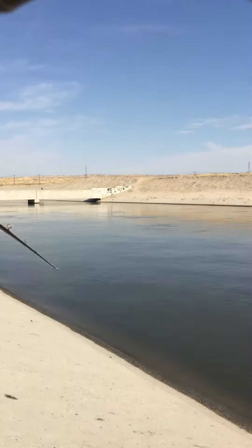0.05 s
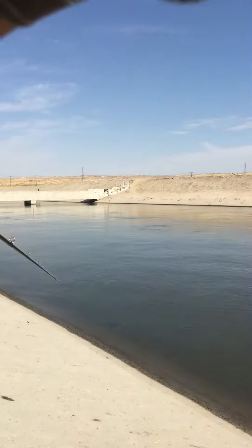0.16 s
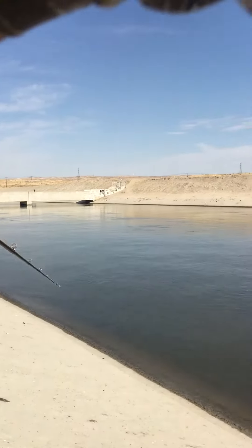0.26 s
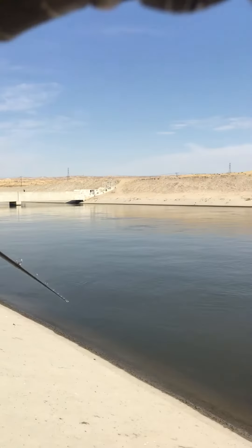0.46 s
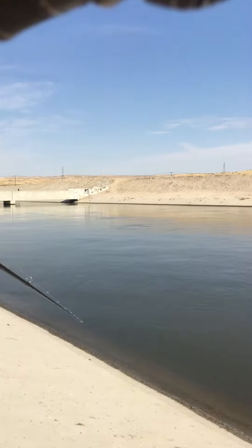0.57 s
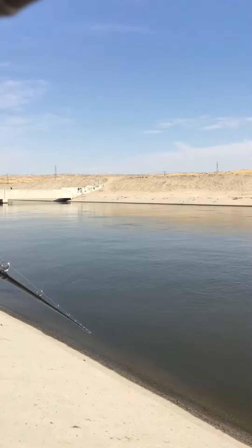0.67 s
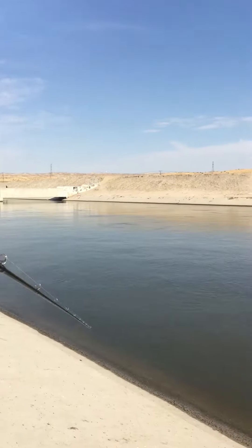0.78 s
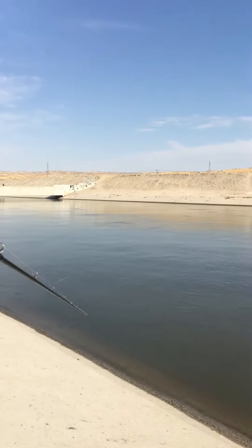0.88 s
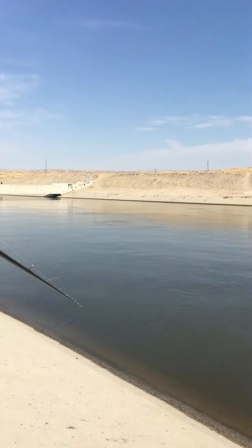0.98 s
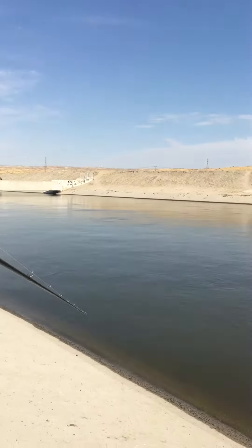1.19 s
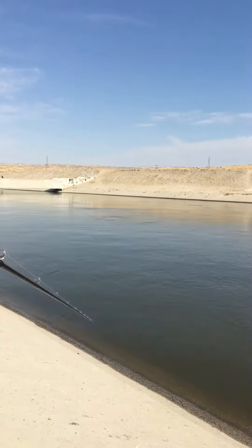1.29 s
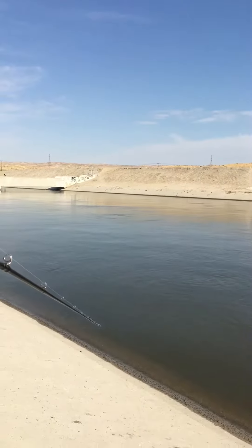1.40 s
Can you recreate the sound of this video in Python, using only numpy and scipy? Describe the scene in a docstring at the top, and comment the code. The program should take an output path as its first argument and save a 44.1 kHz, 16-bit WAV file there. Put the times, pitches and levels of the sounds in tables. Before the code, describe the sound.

One sharp plastic click from fishing gear, with faint scrapes, rustling and light wind.

```python
"""A small plastic part of some fishing gear snaps home close by: one sharp click, cracking and ringing.
Five short stick-slip scrapes lead up to it; a dull tap, soft rustling of hand and sleeve and tiny
ticks follow. Behind it lie a steady distant rush on the bank of a wide canal and a faint hiss.
Light wind buffets the microphone, most near the end."""
import sys
import numpy as np
from scipy import signal
from scipy.fft import rfft, irfft
from scipy.io import wavfile
from scipy.ndimage import uniform_filter1d

SR = 44100
rng = np.random.default_rng(int(sys.argv[2]) if len(sys.argv) > 2 else 0)


def bounce(signal):
    """Save signal as a 16-bit WAV file at the path given by the first command-line argument."""
    frames = np.transpose(np.atleast_2d(signal))
    limited = np.clip(frames, -1, 1)
    pcm = np.round(limited * 32767).astype(np.int16)
    wavfile.write(sys.argv[1], SR, pcm)


N = 63945
T = np.arange(N) / SR


def from_db(db):
    """Decibels to gain."""
    return 10 ** (np.asarray(db) / 20)


def unit_rms(x):
    """Scale to unit power."""
    return x / np.sqrt(np.mean(x ** 2) + 1e-20)


def envelope(rows):
    """Gain over time from rows of (s, dB)."""
    return from_db(np.interp(T, *np.transpose(rows)))


def colour(x, spectrum):
    """Minimum-phase filter of unit power gain, shaped by rows of (Hz, dB)."""
    hz, db = np.transpose(spectrum)
    grid_hz = np.linspace(0, SR / 2, N + 1)
    gain = unit_rms(from_db(np.interp(np.log(grid_hz + 1), np.log(hz), db)))
    cepstrum = irfft(np.log(gain))
    causal_fold = np.r_[1, np.full(N - 1, 2), 1, np.zeros(N - 1)]
    response = np.exp(rfft(cepstrum * causal_fold))
    return irfft(rfft(x, 2 * N) * response)[:N]


def noise(spectrum):
    """Coloured noise of unit power."""
    return unit_rms(colour(rng.standard_normal(N), spectrum))


def grains(per_s, spread_db):
    """Random tiny clicks of uneven size, unit power."""
    onsets = rng.random(N) < per_s / SR
    signs = rng.choice([-1, 1], N)
    sizes = from_db(spread_db * np.minimum(rng.exponential(1, N), 4))
    return unit_rms(onsets * signs * sizes)


def ring(force, modes):
    """Damped modes (Hz, dB, T60 s) driven by a force; signs alternate."""
    out = np.zeros(N)
    for k, (hz, db, t60_s) in enumerate(modes):
        radius = np.exp(-np.log(1000) / (t60_s * SR))
        angle = 2 * np.pi * hz / SR
        feedback = [1, -2 * radius * np.cos(angle), radius * radius]
        out += (-1) ** k * from_db(db) * signal.lfilter([0, np.sin(angle)], feedback, force + 1e-18)
    return out


def clicks(rows):
    """One impulse for each (s, dB)."""
    out = np.zeros(N)
    for start_s, db in rows:
        out[min(int(round(start_s * SR)), N - 1)] += from_db(db)
    return out


def bursts(rows, t60_s):
    """A decaying puff of white noise for each (s, dB)."""
    radius = np.exp(-np.log(1000) / (t60_s * SR))
    decay = signal.lfilter([1], [1, -radius], clicks(rows) + 1e-18)
    return decay * rng.choice([-1, 1], N)


def background(rush_db=-49.5):
    """Steady far rush and a faint hiss that swells and sinks."""
    # Each row: frequency in Hz, relative density in dB.
    rush_spectrum = [(30, -2), (120, -2), (250, -1), (430, -5), (700, -3), (1100, 1), (1400, -12),
                     (2000, -11.5), (3000, -21.5), (4500, -31), (8000, -39.5), (16000, -46.5)]
    hiss_spectrum = [(1500, -3.5), (3500, 0.5), (8000, -4.5), (9700, -4), (10600, -9), (16000, -10.5)]
    # Each row: time in seconds, level in dB.
    hiss_levels = [(0, -73.5), (.22, -71), (.27, -63), (.45, -62.5), (.62, -62.5), (.70, -79), (.84, -69.5),
                   (.90, -80.5), (1.10, -67), (1.16, -67.5), (1.25, -72.5), (1.45, -73)]
    return from_db(rush_db) * noise(rush_spectrum) + envelope(hiss_levels) * noise(hiss_spectrum)


def wind(swing_gain_db=2.5, eddy_db=-45.5, strong_gust_db=-39.5, eddy_exponent=1.9):
    """Slow pressure swings on the microphone follow the gusts; finer eddies grow faster than they do."""
    # Each row: time in seconds, relative level in dB.
    gust_levels = [(0.0, -67), (0.258, -47.5), (0.306, -57), (0.35, -47.5), (0.448, -58.5), (0.528, -46),
                   (0.642, -58.5), (0.702, -41.5), (0.758, -58.5), (0.794, -47), (0.944, -65), (1.062, -40),
                   (1.106, -49), (1.154, -34.5), (1.198, -47), (1.218, -36), (1.42, -48), (1.45, -45)]
    # Each row: frequency in Hz, relative density in dB.
    swing_spectrum = [(18, -30.5), (32, -16.5), (50, 4.5), (68, -3.5), (95, -12), (150, -22), (300, -36),
                      (800, -76)]
    eddy_spectrum = [(40, -24), (80, -1.5), (150, -3.5), (220, -24), (500, -31.5), (1200, -58)]
    gust = envelope(gust_levels)
    swings = noise(swing_spectrum)
    swings /= np.sqrt(uniform_filter1d(swings ** 2, size=2200) + 1e-6)  # even power over 50 ms
    eddies = noise(eddy_spectrum) * (gust / from_db(strong_gust_db)) ** eddy_exponent
    return from_db(swing_gain_db) * gust * swings + from_db(eddy_db) * eddies


def sleeve_brushes():
    """Cloth grains swell and fade with each short stroke."""
    # Each row: centre in seconds, peak in dB, Gaussian sigma in seconds.
    strokes = [(1.126, -58, 0.0063), (1.15, -53.5, 0.0082), (1.178, -57.5, 0.0091), (1.333, -62, .004)]
    # Each row: frequency in Hz, relative density in dB.
    cloth_spectrum = [(800, -1), (2000, 6), (3000, 0.5), (4200, -0.5), (6000, -6), (9500, -5), (11000, -17),
                      (16000, -19)]
    swell = sum(from_db(db) * np.exp(-.5 * ((T - at_s) / sigma_s) ** 2) for at_s, db, sigma_s in strokes)
    return colour(swell * grains(per_s=3400, spread_db=2.0), cloth_spectrum)


def handling():
    """The grip shifts: hand and sleeve rub, with dull taps and tiny bright ticks."""
    # Each row: time in seconds, level in dB.
    rub_levels = [(0, -77), (.30, -76), (.345, -51), (.42, -48.5), (.475, -45), (.53, -64), (.68, -60.5),
                  (.95, -61.5), (1.11, -62.5), (1.15, -53), (1.23, -58.5), (1.30, -63), (1.35, -60.5),
                  (1.45, -89)]
    tap_hits = [(.3915, -2.5), (.4032, -16), (.4590, -33), (.4725, -19)]
    tick_hits = [(.669, -50), (.7538, -48), (.7645, -50), (.845, -54.5), (1.133, -44), (1.215, -51.5),
                 (1.336, -56), (1.353, -50), (1.392, -57), (1.424, -56), (1.439, -54)]
    # Each row: frequency in Hz, relative density in dB.
    rub_spectrum = [(150, -2), (700, 8.5), (1250, 1.5), (1800, -2), (2500, -6.5), (3000, -8), (3700, -8),
                    (5400, -16.5), (6200, -15.5), (7000, -12), (8500, -30.5), (16000, -33)]
    tick_spectrum = [(2000, -17), (4500, -9), (7500, -3), (11000, -7.5), (16000, -18)]
    # Dead knock. Each row: frequency in Hz, gain in dB, T60 in seconds.
    tap_modes = [(780, -20.5, 0.0069), (1210, -22, 0.0053), (2430, -32, 0.006), (3700, -25.5, .002),
                 (5400, -30.5, 0.0024), (7000, -36.5, .002)]
    rub = colour(grains(per_s=3000, spread_db=6.0) * envelope(rub_levels), rub_spectrum)
    taps = ring(clicks(tap_hits), tap_modes)
    ticks = colour(bursts(tick_hits, t60_s=0.0034), tick_spectrum)
    return taps + ticks + rub


def scrapes(ramp_s=0.0026):
    """Dense runs of slips hiss and make the rubbed edge sing."""
    # Each row: start in seconds, length in seconds, hiss in dB, ring in dB.
    runs = [(0.068, 0.0044, -73, -50), (0.11, 0.0114, -51.5, -51), (0.139, 0.01, -58.5, -52),
            (0.161, .012, -51.5, -46), (0.1908, 0.0065, -48.5, -44.5)]
    # Each row: frequency in Hz, gain in dB, T60 in seconds.
    edge_modes = [(2303, -8, 0.014), (2430, -9.5, 0.0082)]
    # Each row: frequency in Hz, relative density in dB.
    slip_spectrum = [(800, -18), (2300, -1), (3200, -5), (5400, 3), (8000, -2.5), (9600, 3.5),
                     (11000, -6.5), (13000, -8), (16000, -17)]
    slips = grains(per_s=6900, spread_db=4)
    hiss_gain, ring_gain = np.zeros(N), np.zeros(N)
    for start_s, length_s, hiss_db, ring_db in runs:
        inside_s = np.minimum(T - start_s, start_s + length_s - T)
        gate = np.clip(inside_s / ramp_s + .5, 0, 1)
        hiss_gain += gate * from_db(hiss_db)
        ring_gain += gate * from_db(ring_db)
    return colour(slips * hiss_gain, slip_spectrum) + ring_gain * unit_rms(ring(slips, edge_modes))


def snap(crack_gain_db=-6.5):
    """The plastic part catches, chatters home and bounces; each contact cracks and rings."""
    # Each row: start in seconds, ring drive in dB, crack drive in dB.
    contacts = [(0.2337, -29.5, -21), (0.2351, 3.5, -7), (.23555, -6.5, -18), (.23724, -0.5, -14),
                (0.2387, -7.5, -26), (0.2433, -27, -23), (.2585, -33.5, -47)]
    # Each row: frequency in Hz, gain in dB, T60 in seconds.
    part_modes = [(84.4, -54.5, .06), (548, -36, 0.054), (703, -29, .028), (861, -28, 0.019),
                  (1170, -29, 0.033), (1957, -21, 0.0097), (2160, -16, 0.02), (2670, -14.5, 0.01),
                  (2940, -18, 0.013), (3426, -23, .013), (3946, -28.5, 0.024), (5370, -13, 0.01),
                  (5740, -25, 0.02), (7180, -23, 0.011), (8550, -25.5, .017), (9560, -27.5, 0.021)]
    # Each row: frequency in Hz, relative density in dB.
    crack_spectrum = [(300, -23), (600, -4), (1500, -1.5), (2800, -2), (4300, -3), (6000, 2.5), (9500, 3),
                      (11000, -6), (13500, -11), (16000, -10.5)]
    force = clicks([(start_s, db) for start_s, db, _ in contacts])
    cracks = bursts([(start_s, db) for start_s, _, db in contacts], t60_s=0.011)
    return ring(force, part_modes) + from_db(crack_gain_db) * colour(cracks, crack_spectrum)


def scene():
    """All sources at one microphone."""
    return (snap() + scrapes() + handling() + sleeve_brushes() + wind() + background())[None]


def record(dry):
    """The microphone saturates softly on peaks; a steep low-pass cuts the top."""
    saturation, cutoff_hz = 0.67, 16000
    rounded = saturation * np.tanh(dry / saturation)
    lowpass = signal.ellip(10, .2, 80, cutoff_hz, fs=SR, output="sos")
    return signal.sosfilt(lowpass, rounded)


dry = scene()
out = record(dry)
bounce(out)
```